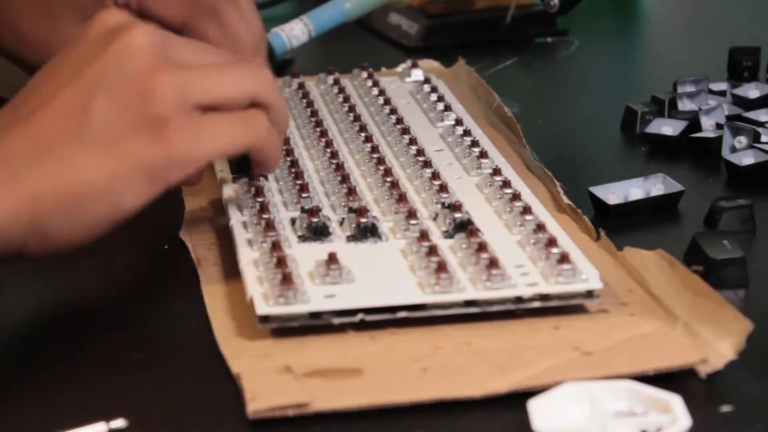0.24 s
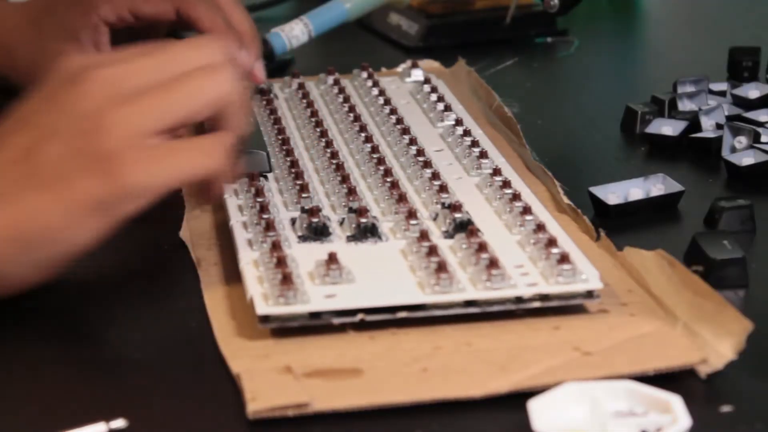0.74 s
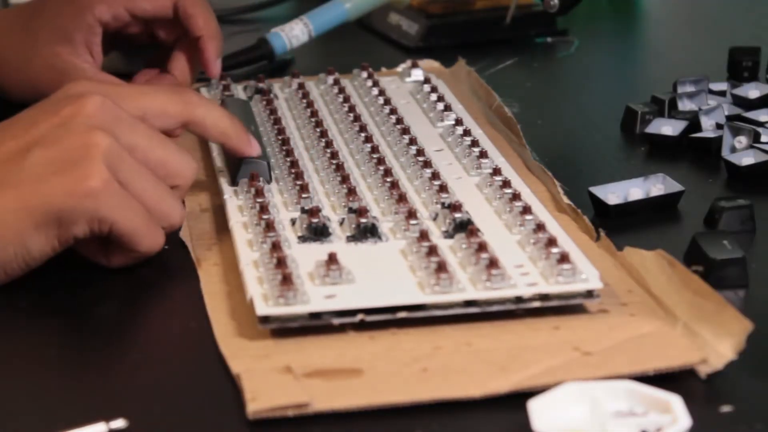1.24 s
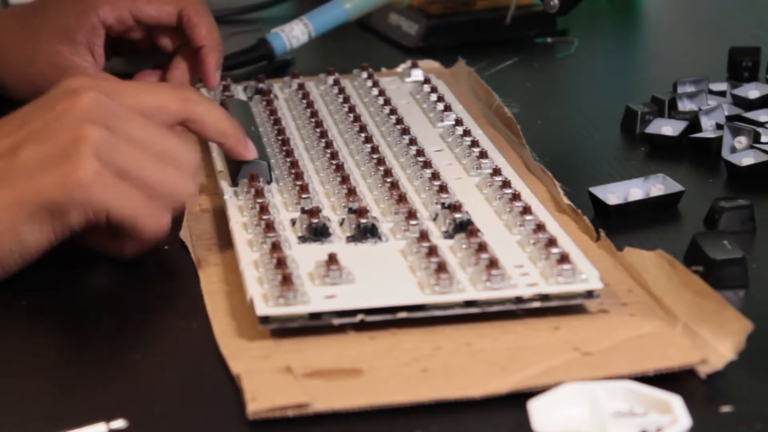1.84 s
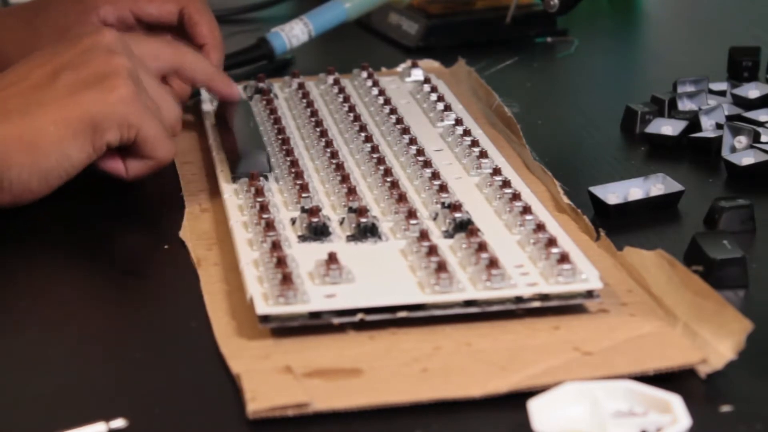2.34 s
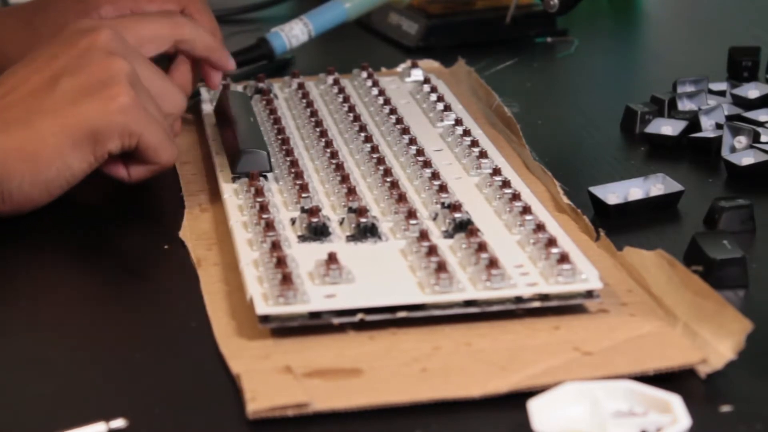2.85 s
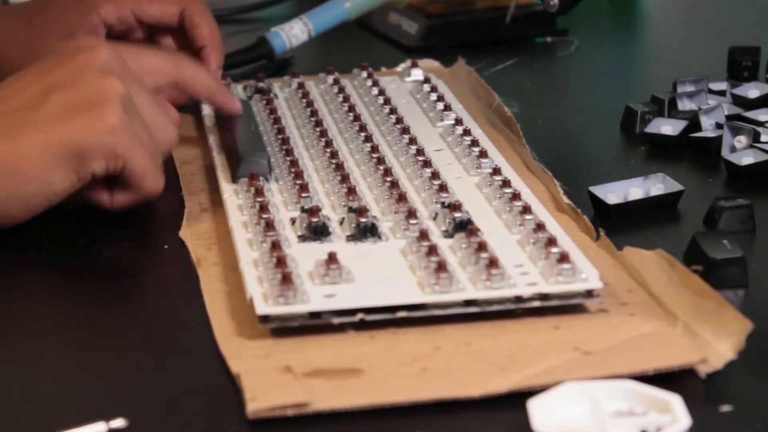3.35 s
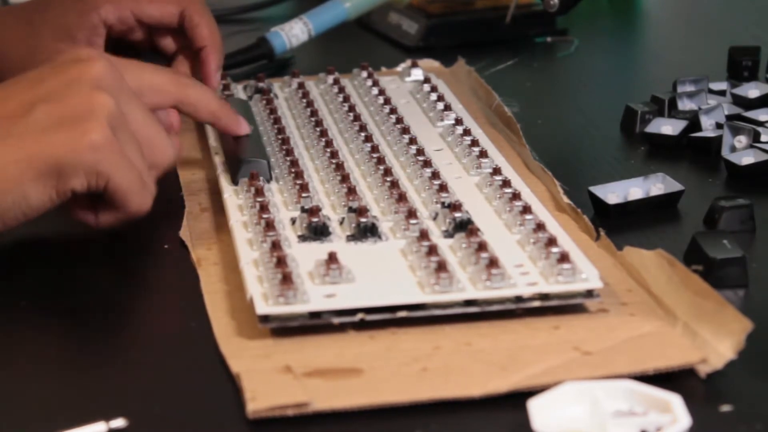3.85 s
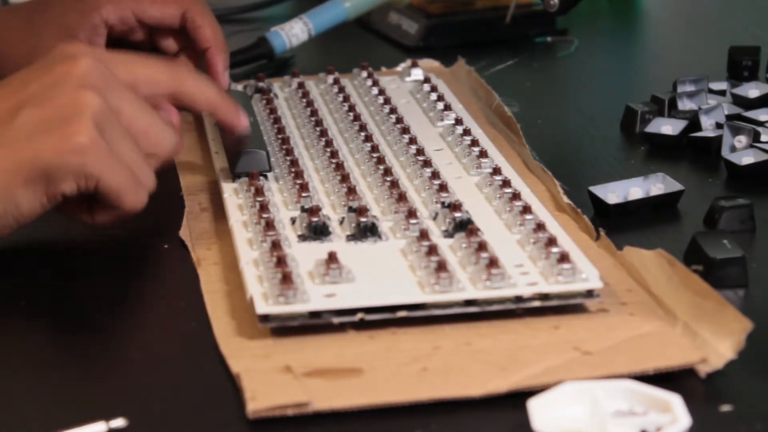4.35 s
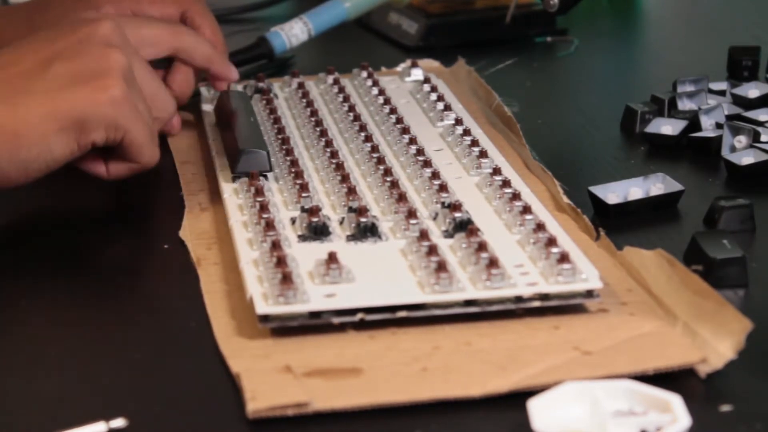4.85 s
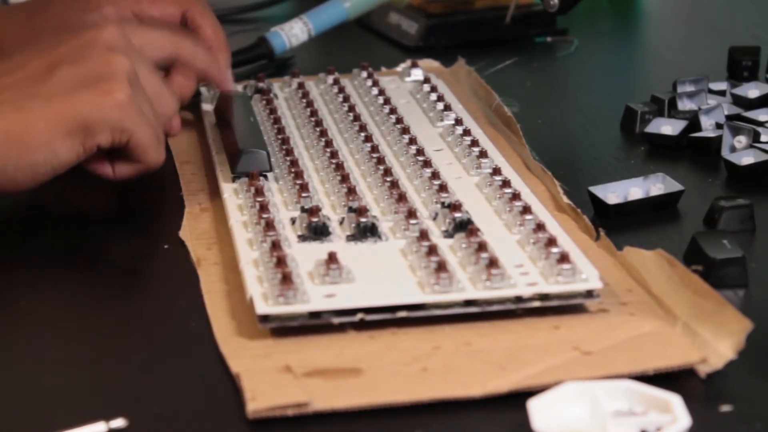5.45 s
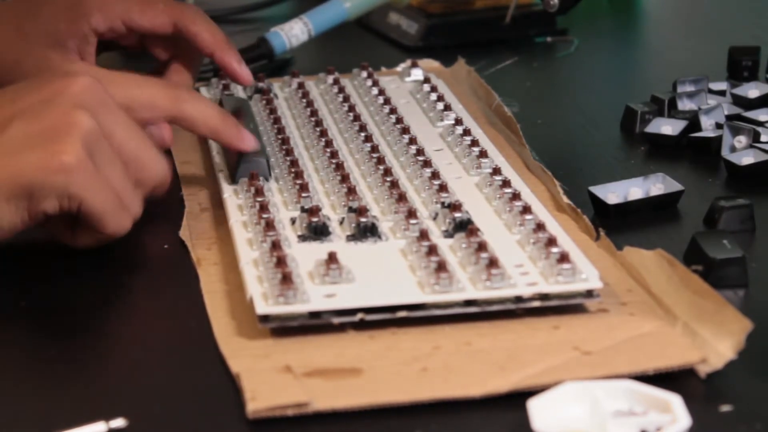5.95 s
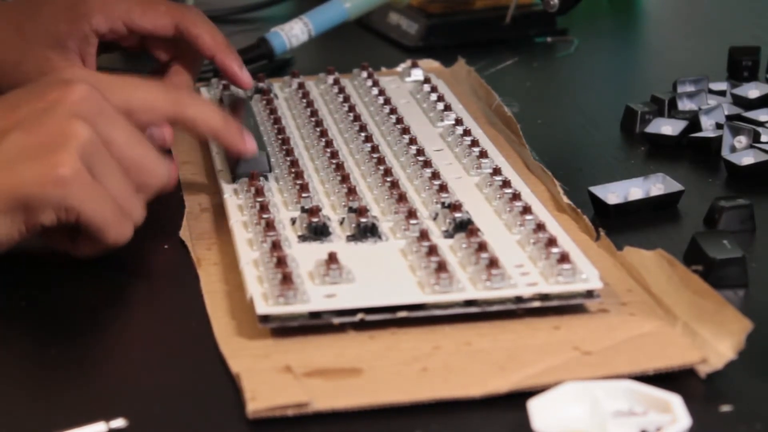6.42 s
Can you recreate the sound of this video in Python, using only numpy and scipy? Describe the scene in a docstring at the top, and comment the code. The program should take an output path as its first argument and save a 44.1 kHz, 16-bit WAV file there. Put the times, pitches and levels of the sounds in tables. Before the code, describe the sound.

Close, dry mono sound of a bare mechanical keyboard lying on cardboard on a desk. First a dull bump with faint rubbing skin, then a rapid run of hollow plastic spacebar clacks, press and release alternating, with small rattles and a muted desk thud. A softer, tickier stretch comes early and another late; after a short gap, louder clacks return to the end. Low rumble lies underneath.

```python
"""A hand bumps the board, a low desk rumble swells with it and stays underneath, and fingertips brush the board.
A finger then taps a long plastic spacebar on a bare keyboard plate lying on cardboard on a desk, in mono.
Presses and releases clack: decaying modes for the key, filtered noise for its loose parts.
The desk carries a late thud to the microphone as slower modes; the small room answers by echoes and sparse taps.
Rumble, brushing skin and quiet air are coloured noise."""
import sys
import numpy as np
from scipy import signal
from scipy.fft import rfft, irfft
from scipy.io import wavfile
from scipy.ndimage import uniform_filter1d

SR = 44100
rng = np.random.default_rng(int(sys.argv[2]) if len(sys.argv) > 2 else 0)


def linear_from_db(decibels):
    """Turn decibels (scalar or array-like) into linear amplitude factors; 0 gives 1."""
    return 10 ** (np.asarray(decibels, float) / 20)


def to_wav(sig):
    """Store sig (one row per channel, or 1-D mono) as 16-bit WAV at the path in sys.argv[1].

    Samples outside -1..1 are clipped; the rate is SR.
    """
    pcm = np.clip(np.atleast_2d(sig), -1, 1) * 32767
    pcm = np.round(pcm).astype(np.int16)
    wavfile.write(sys.argv[1], SR, pcm.T)  # frames by channels


N = 294588

# Spectra (AIR, DEEP, UPPER, SKIN, RATTLE, TICK) shape noise that is then scaled to rms 1.
# quiet air: [pitch_hz, relative_db per Hz]
AIR_SPECTRUM = [(250, -56), (350, -6.5), (600, -11.5), (2000, -18.5), (6000, -22), (9000, -24.5),
                (16000, -34.5)]
AIR_DB = -76.5
# deep rumble in the desk: [pitch_hz, relative_db per Hz]
DEEP_SPECTRUM = [(15, -4), (30, 12), (55, 11), (85, 4.5), (110, -51), (300, -110)]
# course of the deep rumble: [time_s, level_db]
DEEP_LEVEL = [(0, -71), (.19, -59), (.24, -41.5), (.55, -40), (.75, -48.5), (1.11, -54), (1.95, -47.5),
              (2.53, -52), (3.2, -43), (3.45, -53), (4.2, -49), (4.6, -52), (5.26, -47), (5.8, -51.5),
              (6.4, -55.5), (6.59, -43), (6.68, -47)]
# upper rumble in the desk: [pitch_hz, relative_db per Hz]
UPPER_SPECTRUM = [(20, -72.5), (70, -6.5), (95, -7), (125, -0.5), (170, -5), (240, 0), (290, -19),
                  (380, -33.5), (900, -110)]
# the upper rumble grows with recent thuds
UPPER_REST_DB, UPPER_TAPPED_DB, UPPER_SETTLE_S = -61.5, -16, 0.1
# the hand bumps the board, which then keeps shifting
BUMP_S, BUMP_DB, BUMP_RISE_S, BUMP_HOLD_S, BUMP_T60_S = 0.21, -33.5, 0.03, 0.096, 0.14
BUMP_AFTER_DB, BUMP_AFTER_T60_S = -48, 1.66

# fingers brushing the board: [start_s, length_s, level_db, swell_db toward the end, low_part_db]
BRUSH_STROKES = [(-.1, 0.12, -77, 1, 1), (0.315, 0.25, -64, -7, -2), (0.677, 0.25, -67.5, 6.5, -10),
                 (.88, 0.083, -62.5, -4, 7.5)]
# skin on the board: [pitch_hz, relative_db per Hz]
SKIN_SPECTRUM = [(290, -52), (500, -24), (619, -31), (1240, -14), (1350, 1), (2500, -16), (4050, -3),
                 (7060, -2), (10800, -20), (15000, -35)]
SKIN_SPLIT_HZ = 2500  # below this lies the low part of a stroke
BRUSH_RISE_S, BRUSH_T60_S, BRUSH_FLICKER_DB = 0.045, 0.14, 2

# modes of desk and cardboard: [pitch_hz, relative_db, t60_s, delay_s, rise_s]
DESK_MODES = [(119, -16.5, 0.13, 0.0022, 0.0056), (165, -33.5, 0.056, 0.0076, 0.0087),
              (218.4, 8.5, 0.028, 0.0012, 0.0045), (234.8, 1.5, 0.18, 0.01248, 0.0077),
              (275, -11.5, 0.19, 0.01312, 0.0054), (389.5, -13, 0.16, 0.0011, 0.0017),
              (425, -10, 0.071, 0.00071, 0.0047), (532, -21, 0.14, 0.0011, 0.0096),
              (551, -18.5, 0.089, 0.00026, 0.0082)]
FAR_TILT_DB = 4  # per octave above the lowest desk mode: the far end sounds the cardboard more than the desk

# nearby surfaces: [delay_s, level_db]
NEAR_ECHOES = [(.0112, -21), (.0135, -10)]
# decay of the room: [pitch_hz, t60_s]
ROOM_DECAY = [(300, 1), (1000, 0.37), (3000, 0.24), (7000, 0.3), (11000, 0.35), (15000, 0.39)]
ROOM_DB = -8  # energy of a whole tail before the near echoes

# modes of keycap, switch and plate: [pitch_hz, relative_db within its part, t60_s]
KEY_MODES = [(806, -13, 0.021), (1178, -6, 0.0088), (1360, 0.5, 0.0056), (1824, -5, 0.015),
             (1986, -5, 0.012), (2150, -12.5, 0.016), (2566, -6, 0.01), (2670, 1, 0.0044),
             (3093, -4, 0.0043), (3296, -5, 0.0068), (3448, -11, 0.0084), (3634, -4.5, 0.0068),
             (3973, 1.5, 0.012), (4056, -5.5, 0.017), (4117, -2, 0.014), (4690, -17.5, 0.02),
             (4770, -6.5, 0.0063), (5390, -15, 0.0055), (5925, -15, 0.013), (6257, -3, 0.01),
             (7110, -5, 0.0092), (7316, -5, 0.0089), (7580, -2.5, 0.0025), (9200, -33.5, .006)]
# edges between the parts knock, body, cap ring, stem and wire: [pitch_hz]
PART_EDGES_HZ = [2720, 3750, 4600, 6600]
# loose parts of the key: [pitch_hz, relative_db per Hz]
RATTLE_SPECTRUM = [(400, -20), (1200, -4), (3000, 3.5), (7000, -2.5), (10000, -9), (13000, -16),
                   (16000, -26.5)]
# high hiss of the loose wire at the far end: [pitch_hz, relative_db per Hz]
TICK_SPECTRUM = [(5000, -30.5), (9000, -9.5), (13000, 5.5), (15500, 2), (17000, -26)]
TICK_DB, WIRE_IN_CLACK_DB = -25, -6  # both against the stem

# the fingertip meets the cap: [start_s, level_db]
TOUCHES = [(0.159, -60), (0.18, -60), (1.137, -50.5), (1.287, -47.5), (2.19, -49.5), (2.197, -49.5),
           (2.933, -42), (3.1015, -44), (4.1472, -47), (4.7777, -43), (4.935, -50), (5.0935, -45),
           (5.259, -44), (5.4154, -43), (5.557, -50), (5.9551, -42)]
# parts of a touch, added to its level: [knock_db, body_db, cap_ring_db, stem_db, wire_db]
TOUCH_SHARE_DB = [0, 1.5, -2.5, -8, -2]
# the bar bottoms out: [start_s, body_db, cap_ring_db]
PRESSES = [(1.149, -23, -26.5), (1.294, -15.5, -15.5), (1.4442, -12.5, -20), (1.5964, -13.5, -19.5),
           (1.7461, -7, -15), (1.8701, -12.5, -18), (2.2024, -38.5, -40.5), (2.3346, -35.5, -45),
           (2.479, -28, -24.5), (2.635, -19, -26.5), (2.776, -42.5, -57), (2.9444, -20.5, -24.5),
           (3.11, -16.5, -21), (3.2628, -18.5, -30), (3.407, -13.5, -25), (3.5521, -6, -9),
           (3.704, -8.5, -17.5), (3.8608, -10, -20), (4.0174, -11.5, -21.5), (4.165, -13, -23),
           (4.3189, -9.5, -14), (4.4814, -12.5, -23), (4.6365, -19.5, -28), (4.7937, -23, -29),
           (4.9484, -20, -22.5), (5.1073, -17, -23), (5.2726, -17, -21), (5.4277, -18, -20.5),
           (5.5707, -15, -23.5), (5.9645, -5.5, -16), (6.1116, -17.5, -20), (6.2613, -9.5, -17),
           (6.421, -22.5, -27.5), (6.5681, -10.5, -22)]
# the bar springs back to its stop: [start_s, body_db, cap_ring_db]
RELEASES = [(1.235, -58, -37.5), (1.3801, -27, -31), (1.5202, -23, -29), (1.6655, -20.5, -21.5),
            (1.81, -19, -16), (1.9466, -20.5, -20), (2.2732, -28, -24.5), (2.4115, -27.5, -25.5),
            (2.5521, -22.5, -26.5), (2.7144, -48, -24), (2.8496, -28, -25.5), (3.0145, -23, -23.5),
            (3.1818, -31, -22), (3.3377, -21, -22), (3.4803, -20, -23), (3.6308, -20.5, -16.5),
            (3.781, -18, -14.5), (3.9353, -24, -17.5), (4.087, -19.5, -23), (4.2392, -23.5, -21.5),
            (4.3928, -23.5, -21), (4.5461, -25.5, -15.5), (4.7049, -26.5, -28), (4.864, -23, -29),
            (5.0225, -31, -24.5), (5.1773, -22.5, -28), (5.3399, -25.5, -25), (5.4948, -24.5, -28),
            (5.639, -31.5, -22.5), (6.0287, -23.5, -25.5), (6.182, -17.5, -16.5), (6.3313, -19.5, -19.5),
            (6.4795, -23, -23), (6.6366, -22, -25)]
# the hand knocks the board: [start_s, body_db, cap_ring_db]
HAND_KNOCKS = [(0.2211, -45, -37.5), (0.2479, -41, -49)]
# while the finger taps the far end of the bar: [from_s, to_s]
FAR_END_SPANS = [(2.15, 3.22), (4.6, 5.7)]

USUAL_DB = -20  # strength of an ordinary clack
# Laws: rows are knock, stem and desk thud; [usual_db, db per db of strength, far_end_extra_db]
PRESS_LAW = [(-28.5, 0.66, 3), (-30, 0.5372, -0.5), (-36, 0.2971, -1)]
# the same rows and columns for a release
RELEASE_LAW = [(-46, 0.7, 11), (-34, .9, 4.7), (-37.5, 0.75, 1.8)]
# the same rows and columns for the hand on the board
HAND_LAW = [(-37, .1, 0), (-36.5, 0.079, 0), (-29.5, 0.22, 0)]
# random spread of the laws: [knock_db, stem_db, thud_db]
SCATTER_DB = [2, 1.2, 2]
KNOCK_MOST_DB = -24.5  # harder blows add no more knock

# when the steadying wire under the bar lands a moment after the press: [from_s, to_s]
WIRE_SPANS = [(2.15, 3.0), (4.9, 5.7)]
# parts of a wire landing, added to its level: [knock_db, body_db, cap_ring_db, stem_db, wire_db]
WIRE_SHARE_DB = [-36, -14.5, -7.5, -8, 3.5]
WIRE_DB = -30
WIRE_LAG_S, WIRE_LAG_SLOPE = 0.0037, 0.00011  # at usual strength; s later per dB softer


def evened(x):
    """Scales to rms 1."""
    return x / np.sqrt(np.mean(x ** 2) + 1e-20)


def read(points, hz):
    """Reads a spectrum on a log-frequency axis."""
    f, value = np.transpose(points)
    return np.interp(np.log(hz + 1), np.log(f + 1), value)


def level(rows):
    """Gain along a dB curve, silent outside it."""
    time_s, level_db = np.transpose(rows)
    return linear_from_db(np.interp(np.arange(N) / SR, time_s, level_db, -200, -200))


def add(mix, s, sound):
    """Mixes a sound in at time s."""
    part = mix[round(s * SR):][:len(sound)]
    part += sound[:len(part)]


def noise(spectrum):
    """Steady noise of a given colour, at rms 1."""
    hz = np.fft.rfftfreq(N, 1 / SR)
    white = rfft(rng.standard_normal(N))
    return evened(irfft(white * linear_from_db(read(spectrum, hz)), N))


def envelope(start, rise, hold, t60):
    """Rises, holds and dies away."""
    t = np.arange(N) / SR - start
    return np.clip(t / rise, 0, 1) ** 2 * linear_from_db(-60 * np.maximum(t - rise - hold, 0) / t60)


def inside(s, spans):
    """Whether time s lies in one of the spans."""
    return any(a <= s < b for a, b in spans)


def strength_db(body_db, ring_db):
    """Body and cap ring heard together, against an ordinary clack."""
    return 20 * np.log10(np.hypot(linear_from_db(body_db), linear_from_db(ring_db))) - USUAL_DB


def clacks():
    """Every blow as (s, knock, body, cap ring, stem, thud dB); knock, stem and thud follow the law of its kind."""
    rows = []
    for table, law in ((PRESSES, PRESS_LAW), (RELEASES, RELEASE_LAW), (HAND_KNOCKS, HAND_LAW)):
        usual_db, slope, far_db = np.transpose(law)
        chance = rng.standard_normal((len(table), len(law)))
        for (s, body_db, ring_db), luck in zip(table, chance):
            lawful_db = usual_db + slope * strength_db(body_db, ring_db)
            lawful_db = lawful_db + far_db * inside(s, FAR_END_SPANS)
            knock, stem, thud = lawful_db + luck * SCATTER_DB
            rows.append((s, min(knock, KNOCK_MOST_DB), body_db, ring_db, stem, thud))
    return rows


def air():
    """Quiet air at the microphone: steady coloured noise."""
    return linear_from_db(AIR_DB) * noise(AIR_SPECTRUM)


def rumble(blows):
    """Low noise in the desk: deep part on its own, upper part stirred by the thuds and the bump of the hand."""
    thuds = np.zeros(N)
    settle = np.exp(-np.arange(SR) / SR / UPPER_SETTLE_S)
    for s, *_, thud_db in blows[:-len(HAND_KNOCKS)]:  # presses and releases only
        add(thuds, s, linear_from_db(thud_db) * settle)
    bump = linear_from_db(BUMP_DB) * envelope(BUMP_S, BUMP_RISE_S, BUMP_HOLD_S, BUMP_T60_S)
    after = linear_from_db(BUMP_AFTER_DB) * envelope(BUMP_S, BUMP_RISE_S, BUMP_HOLD_S, BUMP_AFTER_T60_S)
    tapped = linear_from_db(UPPER_TAPPED_DB) * uniform_filter1d(thuds, size=SR // 20)
    upper = linear_from_db(UPPER_REST_DB) + tapped + bump + after
    return noise(DEEP_SPECTRUM) * level(DEEP_LEVEL) + noise(UPPER_SPECTRUM) * upper


def brush():
    """Skin hisses over the board in short uneven strokes, each with its own share of low part."""
    t, skin = np.arange(N) / SR, noise(SKIN_SPECTRUM)
    lowpass = signal.butter(4, SKIN_SPLIT_HZ, fs=SR, output="sos")
    low = signal.sosfiltfilt(lowpass, skin)
    high = skin - low
    strokes = np.zeros(N)
    for s, length, db, swell_db, low_db in BRUSH_STROKES:
        swelling = linear_from_db(db + swell_db * np.clip((t - s) / length, 0, 1))
        shape = envelope(s, BRUSH_RISE_S, length - BRUSH_RISE_S, BRUSH_T60_S)
        strokes += swelling * shape * (high + linear_from_db(low_db) * low)
    flicker = evened(uniform_filter1d(rng.standard_normal(N), size=SR // 40))
    return strokes * linear_from_db(BRUSH_FLICKER_DB * flicker)


def desk(blows):
    """Each blow rings the desk modes; some start almost at once, others arrive late through the cardboard."""
    hz, db, t60, delay, rise = np.transpose(DESK_MODES)
    t = np.maximum(np.arange(SR // 3)[:, None] / SR - delay, 0)
    fade = linear_from_db(db - 60 * t / t60) * (1 - np.exp(-(t / rise) ** 2))
    chance = rng.standard_normal((len(blows), 3, len(DESK_MODES)))
    out = np.zeros(N)
    for (s, *_, thud_db), (size, phase, detune) in zip(blows, chance):
        loose_hz = hz * (1 + 0.012 * detune)  # the board lies loosely
        rings = fade * np.sin(2 * np.pi * loose_hz * t + 0.4 * phase)
        tilt_db = FAR_TILT_DB * inside(s, FAR_END_SPANS) * np.log2(hz / hz[0])
        add(out, s, linear_from_db(thud_db) * rings @ linear_from_db(tilt_db + 2 * size))
    return out


def room(x):
    """A few near echoes, then sparse taps whose bands die at their own speed; three tails take turns."""
    taps = np.zeros((3, SR // 2))
    starts = np.arange(160, SR // 2 - 20, 20)
    at = starts + rng.integers(0, 20, (3, len(starts)))  # one tap in every 20 samples
    np.put_along_axis(taps, at, rng.choice([-1., 1.], at.shape), 1)
    hz, t, z = signal.stft(taps, SR, nperseg=128)
    decay = linear_from_db(-60 * t / read(ROOM_DECAY, hz)[:, None])
    tails = signal.istft(z * decay, SR, nperseg=128)[1]
    tails *= 1 - np.exp(-(np.arange(tails.shape[1]) / SR / 0.0056) ** 2)  # the walls answer late
    tails *= linear_from_db(ROOM_DB) / np.linalg.norm(tails, axis=1, keepdims=True)
    for delay, db in NEAR_ECHOES:
        tails[:, round(delay * SR)] += linear_from_db(db)
    cycles = 1.9 * np.arange(N) / SR + np.arange(3)[:, None] / 3  # 1.9 turns a second, a third apart
    turn = np.cos(2 * np.pi * cycles) * np.sqrt(2 / 3)
    return signal.fftconvolve(x * turn, tails, axes=1).sum(0)[:N]


def key_contacts(blows):
    """Blows, late wire landings and fingertip touches as (s, knock, body, cap ring, stem, wire dB)."""
    contacts = [(*row[:5], row[4] + WIRE_IN_CLACK_DB) for row in blows]
    for s, *db in PRESSES:
        if inside(s, WIRE_SPANS):
            lag = WIRE_LAG_S - WIRE_LAG_SLOPE * strength_db(*db)
            contacts.append((s + lag, *np.add(WIRE_DB, WIRE_SHARE_DB)))
    contacts += [(s, *np.add(db, TOUCH_SHARE_DB)) for s, db in TOUCHES]
    return contacts


def key_ring(contacts):
    """Each contact rings the modes of all five parts, each part at its own level."""
    hz, db, t60 = np.transpose(KEY_MODES)
    t = np.arange(SR // 30)[:, None] / SR
    fade = linear_from_db(db - 60 * t / t60) * (1 - np.exp(-(t / 0.00036) ** 2))
    members = np.searchsorted(PART_EDGES_HZ, hz)[:, None] == np.arange(len(PART_EDGES_HZ) + 1)
    chance = rng.standard_normal((len(contacts), 3, len(KEY_MODES)))
    out = np.zeros(N)
    for (s, *parts_db), (size, phase, detune) in zip(contacts, chance):
        landing = linear_from_db(2 * size) * np.exp(0.4j * phase)  # no two blows land alike
        varied_hz = hz * (1 + 0.015 * detune)  # each contact's modes vary slightly in pitch at random
        parts = fade * np.exp(2j * np.pi * varied_hz * t) @ (landing[:, None] * members)
        parts = parts.imag / abs(parts).max(0)  # each part peaks near 1 before its level
        add(out, s, parts @ linear_from_db(np.array(parts_db)))
    return out


def key_rattle(contacts):
    """Loose parts hiss before and after a contact: the stem slides, all shake, the far wire ticks high up."""
    t = np.arange(SR // 10) / SR
    shake = linear_from_db(-60 * t / 0.026) + linear_from_db(-17 - 60 * t / 0.25)  # quick fade over a weaker, slower one
    shake *= 1 - np.exp(-t / 0.00017)
    slide = np.linspace(0, 1, SR // 60) ** 0.17  # the stem hisses in its guide as it gathers speed
    rattling, ticking = np.zeros((2, N))
    for s, _, _, _, stem_db, _ in contacts:
        add(rattling, s - len(slide) / SR, linear_from_db(stem_db - 34.5) * slide)
        add(rattling, s, linear_from_db(stem_db - 5.5) * shake)
        if inside(s, FAR_END_SPANS):
            add(ticking, s, linear_from_db(stem_db + TICK_DB) * shake)
    return rattling * noise(RATTLE_SPECTRUM) + ticking * noise(TICK_SPECTRUM)


def key(blows):
    """The spacebar itself: ringing modes of the struck parts and noise of the loose ones."""
    contacts = key_contacts(blows)
    return key_ring(contacts) + key_rattle(contacts)


def scene():
    """Air, rumble, fingers and desk under the key; only the key sounds in the room."""
    blows = clacks()
    near = key(blows)
    return (air() + rumble(blows) + brush() + desk(blows) + room(near) + near)[None]


def low_pass(x):
    """Removes everything above the highest recorded frequency."""
    return signal.sosfilt(signal.butter(12, 16770, fs=SR, output="sos"), x)


def record(dry):
    """The finished mix, as stored."""
    return low_pass(dry)


dry = scene()
out = record(dry)
to_wav(out)
```